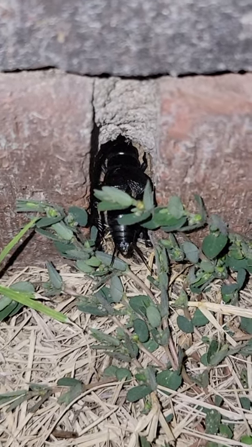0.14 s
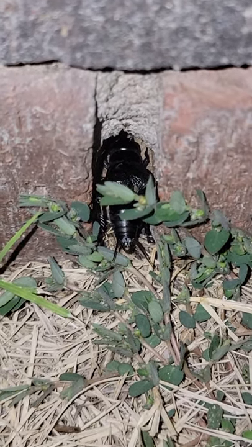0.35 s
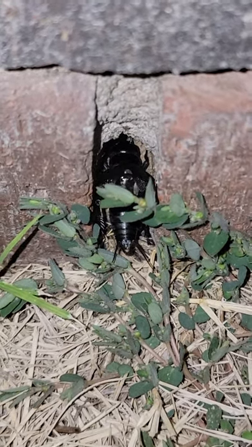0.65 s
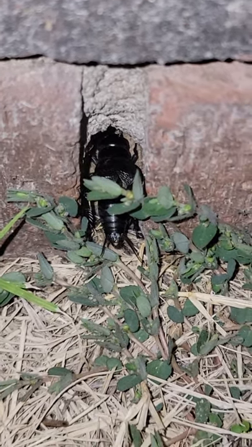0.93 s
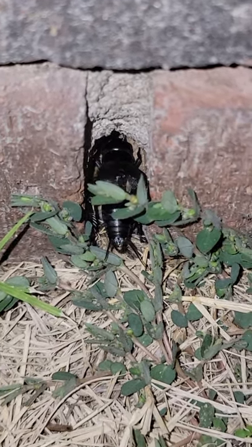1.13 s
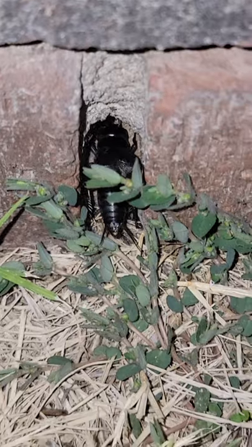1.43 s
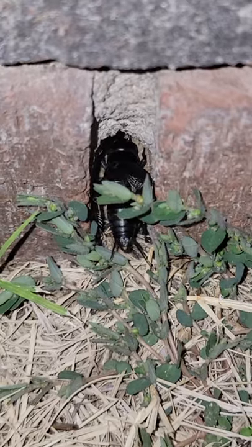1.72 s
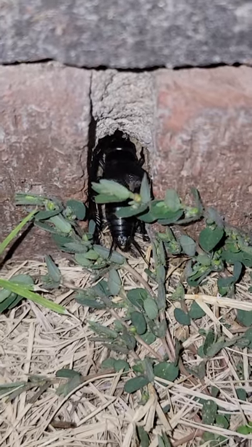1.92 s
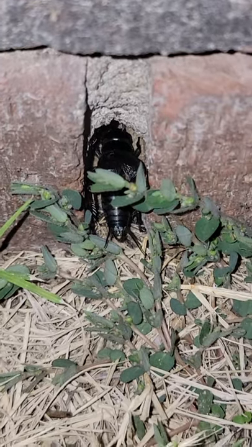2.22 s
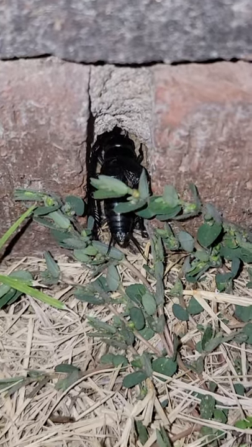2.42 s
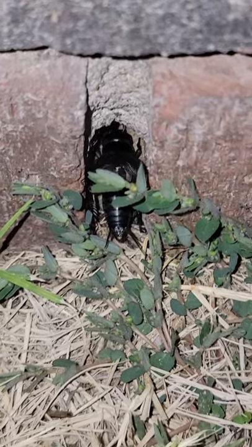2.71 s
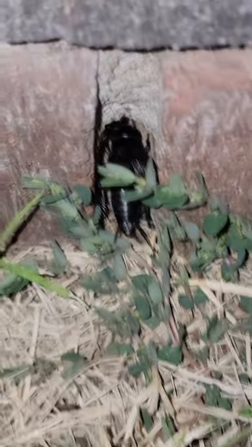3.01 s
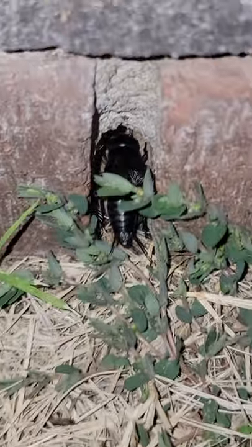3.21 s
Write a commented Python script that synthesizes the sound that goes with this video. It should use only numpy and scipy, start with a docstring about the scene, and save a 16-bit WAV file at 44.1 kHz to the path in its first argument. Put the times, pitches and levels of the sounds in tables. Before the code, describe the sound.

A cricket chirps close by in short, ringing bursts over a low outdoor rumble.

```python
"""A field cricket chirps close by, at the mouth of a hole in a brick wall, over a low outdoor rumble.
Each chirp is a scratchy or soft wing stroke or two, then two loud, pure ones that arch in pitch:
a scraper on one wing runs along a row of teeth (the file) on the other and makes the wing ring.
Traffic fades and faint whistles sound far off. A hand bumps the camera now and then,
and near the end shifts its grip and rubs over the case."""
import sys
import numpy as np
from scipy import signal
from scipy.fft import rfft, irfft
from scipy.io import wavfile
from scipy.ndimage import uniform_filter1d, minimum_filter1d

SR = 44100
rng = np.random.default_rng(int(sys.argv[2]) if len(sys.argv) > 2 else 0)


def generate_wav(signal):
    """Clip the signal to [-1, 1] and save it as 16-bit WAV at the path in sys.argv[1]."""
    frames = np.transpose(np.atleast_2d(signal))
    scaled = np.clip(frames, -1, 1) * 32767
    pcm = np.round(scaled).astype(np.int16)
    wavfile.write(sys.argv[1], SR, pcm)


N = 147735

# Wing strokes that ring. Each row: start in seconds, length in seconds, level in dB,
# top pitch in Hz, depth of the pitch arch from 0 to 1.
STROKES = [(0.4856, 0.031, -35, 4025, 0.4), (0.572, .041, -24.5, 4242, 0.93),
           (0.683, 0.045, -25, 4248, 0.98), (1.13, 0.025, -33, 4050, 0.55),
           (1.190, 0.035, -30.5, 4117, 0.63), (1.281, 0.045, -24.7, 4240, 1),
           (1.395, 0.046, -24.5, 4246, 0.99), (1.85, 0.011, -35.5, 3890, 0.06),
           (1.873, .007, -48, 4000, 0.1), (1.911, 0.037, -31, 4140, 0.66), (1.9939, 0.046, -25, 4234, 1),
           (2.1029, 0.047, -25.5, 4250, 0.98), (2.644, .031, -34, 4030, 0.34),
           (2.725, .042, -25.5, 4217, .95), (2.835, 0.047, -26.5, 4245, 1), (3.326, 0.043, -33, 4040, 0.54)]
WING_HZ, CATCH_S = 3790, 0.0065  # pitch and length of the ring when the scraper catches once


def amp(db):
    """Turns decibels into a number to multiply by."""
    return 10 ** (np.asarray(db) / 20)


def unit(x):
    """Scales a signal to an average power of 1."""
    return x / np.sqrt(np.mean(x ** 2) + 1e-20)


def read(points, hz):
    """Looks up a frequency in a table, blending between rows on a pitch scale."""
    row_hz, value = np.transpose(points)
    return np.interp(np.log(hz + 1), np.log(row_hz + 1), value)


def add(mix, start, sound):
    """Mixes a sound in, with its start given in seconds."""
    part = mix[..., round(start * SR):][..., :sound.shape[-1]]
    part += sound[..., :part.shape[-1]]


def pan(db):
    """Left and right gains that make the left side louder by db."""
    return amp(np.array([[db], [-db]]) / 2)


def noise(colour, level=1):
    """Noise that follows a level curve, then takes its tone colour from a table."""
    white = level * rng.standard_normal(N)
    gains = unit(amp(read(colour, np.fft.rfftfreq(N, 1 / SR))))
    return irfft(rfft(white) * gains, N)


def wander(rate_hz):
    """A smooth random wobble of size about 1, moving at up to about rate_hz."""
    smoothing = np.exp(-(np.fft.rfftfreq(N, 1 / SR) / rate_hz) ** 2)
    return unit(irfft(rfft(rng.standard_normal(N)) * smoothing, N))


def wall_echo(sound):
    """The walls around scatter a sound back as a faint, smooth echo."""
    echo_db, fade_s = -29.5, 0.54  # fade_s is the time to fall by 60 dB
    t = np.arange(SR // 2) / SR
    early_boost = 1 + 2 * np.exp(-t / 0.021)
    tail = rng.standard_normal((2, len(t))) * amp(-60 * t / fade_s) * early_boost
    tail /= np.linalg.norm(tail[0])
    return amp(echo_db) * signal.fftconvolve(sound[1:], tail, axes=1)[:, :N]


def outdoors():
    """Low outdoor rumble, the wavering drone of distant engines, and traffic dying away."""
    # Tone colours of the open air and the traffic. Each row: frequency in Hz, relative level in dB.
    air_colour = [(12, -46), (20, -13), (38, -5), (64, -0.5), (119, -7), (144, -25.5), (171, -14.5),
                  (232, -18.5), (259, -24.5), (324, -26), (400, -27), (581, -27.5), (760, -29.5),
                  (1150, -39.5), (1400, -40), (1750, -47), (4000, -56), (7500, -64), (8800, -71.5),
                  (12500, -78.5), (15500, -71)]
    traffic_colour = [(100, -30.5), (220, 3), (400, 3), (700, -12.5), (1200, -31.5), (2000, -40.5),
                      (8000, -70.5)]
    # Engine notes. Each row: pitch in Hz, width of the wavering in Hz, level in dB.
    engines = [(72.9, 27, -41.5), (112.7, 27, -41), (231.5, 24, -53), (345, 20, -60)]
    # How alike the two sides sound. Each row: frequency in Hz, likeness from 0 to 1.
    likeness = [(30, 0.63), (80, 1), (300, 1), (700, 0.6), (1500, 0.1), (4000, 0.073), (15000, 0.077)]
    # How much louder the left side is. Each row: frequency in Hz, difference in dB.
    left_louder = [(25, 3), (70, 1.5), (150, -2), (400, 2), (1500, 2.5), (8000, 1)]
    # How far the left side lags. Each row: frequency in Hz, lag in radians.
    left_lag = [(20, .2), (70, 0.9), (200, 0.27), (500, 0.64), (1000, 1.2)]
    t, hz = np.arange(N) / SR, np.fft.rfftfreq(N, 1 / SR)
    traffic_level = amp(-44.5 - 9.5 * t)
    rumbles = []
    for _ in range(2):
        air = amp(-35 + wander(3.8)) * noise(air_colour)
        rumbles.append(rfft(air + traffic_level * noise(traffic_colour)))
    drone = 0
    for pitch, width, db in engines:
        phase = 2 * np.pi * pitch * t
        note = wander(width / 2) * np.cos(phase) + wander(width / 2) * np.sin(phase)
        drone += rfft(amp(db) * unit(note))
    same, tilt = read(likeness, hz), amp(read(left_louder, hz) / 2)
    left = (rumbles[0] + drone) * tilt * np.exp(-1j * read(left_lag, hz))
    right = (same * rumbles[0] + np.sqrt(1 - same ** 2) * rumbles[1] + drone) / tilt
    return irfft(np.array([left, right]), N)


def far_whistles():
    """Thin falling whistles, perhaps a bird, so far off that the echo is a large part of them."""
    # Each row is a whistle: start in seconds, length in seconds, level in dB, starting pitch in Hz.
    whistles = [(0.485, 0.047, -66, 1360), (0.546, .125, -58, 1374), (0.75, 0.045, -63, 1360)]
    out = np.zeros((2, N))
    for start, length, db, top_hz in whistles:
        t = np.arange(0, length, 1 / SR)
        hz = top_hz - 5800 * t ** 2
        swell = amp(db) * np.sin(np.pi * t / length)
        add(out, start, swell * np.sin(2 * np.pi * np.cumsum(hz) / SR))
    return out + amp(28) * wall_echo(out)


def hand_on_camera():
    """Each bump is a push that the microphone's bass cut turns into a thud; skin ticks and rubs."""
    # Bumps on the case. Each row: time in seconds, peak level in dB, width of the push in seconds,
    # how much louder the left side is in dB, level of the contact tick in dB.
    bumps = [(1.2902, -17.5, 0.0026, 12, -61), (1.4492, -15.5, 0.0028, 12.5, -51),
             (2.21, -30, 0.0019, 17, -68), (2.2189, -25, 0.0027, 15.5, -62),
             (2.3095, -21, 0.0036, 20.5, -70), (2.904, -28.5, 0.001, 18, -59),
             (2.916, -19.5, 0.0067, 13, -31.5), (2.934, -28, 0.0021, 16, -59),
             (2.9555, -28, 0.0017, 10, -37.5), (2.9617, -9, .0019, 12, -56),
             (2.9832, -15.5, .001, 13, -30.5), (2.9998, -18, 0.0027, -10, -21),
             (3.0386, -17, 0.0012, -17.5, -58), (3.0417, -23, 0.0015, -38.5, -73),
             (3.0515, 0.5, .0014, -4.5, -16.5), (3.16, -21, 0.0026, -4, -80),
             (3.2089, -29, 0.00024, -4, -22), (3.211, -17.5, 0.00091, -5, -35),
             (3.234, -17.5, 0.00043, -14, -42), (3.24, -17, 0.0052, 0.5, -72)]
    # How loudly the fingers rub. Each row: time in seconds, level in dB.
    rub_curve = [(2.88, -64.5), (2.945, -56.5), (2.958, -43), (2.991, -54), (3.004, -38.5), (3.03, -49.5),
                 (3.11, -48.5), (3.16, -55), (3.206, -52), (3.208, -31.5), (3.222, -39.5), (3.29, -39.5),
                 (3.35, -40)]
    # Tone colours of the rubbing, the ticks and the deep rumble as the grip shifts.
    # Each row: frequency in Hz, relative level in dB.
    rub_colour = [(300, -20.5), (700, -4), (1300, 0), (1900, -2), (2200, -7), (2900, -4.5), (4400, -11),
                  (6500, -16), (7500, -22.5), (8500, -30.5), (10500, -37), (13000, -40), (15500, -42)]
    tick_colour = [(300, 13), (1300, 12.5), (2200, -5), (3000, 10), (4300, -10.5), (6800, -10), (8500, -25),
                   (15000, -47)]
    grip_colour = [(10, -8.5), (25, -3.5), (55, -1), (90, -6.5), (160, -16.5), (400, -57.5), (2000, -100)]
    thuds, tick_level = np.zeros((2, N)), np.zeros(N)
    t = np.arange(-SR // 50, SR // 6) / SR
    bass_cut = signal.butter(4, 57.5, "highpass", fs=SR, output="sos")
    for when, db, width, left_db, tick_db in bumps:
        push = 1 / np.cosh(np.clip(2 * t / width, -20, 20))
        leaked = signal.lfilter([1, -1], [1, -np.exp(-0.76 / width / SR)], push)  # the push leaks away
        thud = signal.sosfilt(bass_cut, leaked)
        add(thuds, when + t[0], amp(db) * pan(left_db) * thud / abs(thud).max())
        add(tick_level, when, amp(tick_db) * np.exp(-t[t >= 0] / 0.0011))
    clock = np.arange(N) / SR
    rub_db = np.interp(clock, *np.transpose(rub_curve), left=-120)
    rub_level = amp(rub_db - wander(900))  # the fast wobble makes it grainy
    grip_swell = np.exp(-((clock - 2.98) / 0.052) ** 2)
    grip = amp(-18) * grip_swell * noise(grip_colour)
    skin = np.array([noise(rub_colour, rub_level) + noise(tick_colour, tick_level) for _ in range(2)])
    return thuds + pan(8) * grip + pan(1) * skin


def place_cricket(sound, hz):
    """The cricket reaches the left microphone weaker, the more so at low pitch."""
    left_db = -4.5 + 0.0483 * np.clip(hz - 4216, -300, 300)
    return np.array([sound * amp(left_db), sound])


def skid(length, db):
    """The scraper catches and loses the file; each catch rings the wing for a moment."""
    catches_per_s, spread_hz = 200, 120
    out = np.zeros(int((length + 2 * CATCH_S) * SR))
    t = np.arange(0, CATCH_S, 1 / SR)
    swell = np.sin(np.pi * (t / CATCH_S) ** 0.52) ** 2
    for k, (late, detune, strength) in enumerate(2 * rng.random((12, 3)) - 1):
        start = (k + 0.18 * (late + 1)) / catches_per_s
        if start < length:
            ring = np.sin(2 * np.pi * (WING_HZ + spread_hz * detune) * t)
            add(out, start, amp(db + 2 * strength) * swell * ring)
    return place_cricket(out, WING_HZ)


def stroke_pitch(progress, top_hz, arch):
    """The pitch rises and falls with wing speed, peaking mid-stroke, or later in soft strokes."""
    crest = 0.49 + 0.33 * (1 - arch)
    before_crest = 152 * np.cos(np.pi / 2 * progress / crest) ** 2
    after_crest = 560 * ((progress - crest) / (1 - crest)) ** 2
    return top_hz - arch * np.where(progress < crest, before_crest, after_crest)


def wing_strokes():
    """The scraper drives the wing at the rate it hits teeth. Gives the song and its rasp's level."""
    # Loudness through a stroke. Each row: progress from 0 to 1, strength from 0 to 1.
    stroke_shape = [(0, 0), (.03, .33), (.3, 1), (.6, 1), (.76, 0.81), (.93, 0.2), (1, 0)]
    # The wing's higher tones. Each row: multiple of the pitch, relative level in dB.
    overtones = [(2, -27), (3, -32)]
    # Boost or cut for those tones. Each row: frequency in Hz, change in dB.
    overtone_colour = [(7600, -5.5), (8100, 2.5), (8500, -7.5), (9000, -5), (11400, -9.5), (12000, -1.5),
                       (12400, -0.5), (12800, -9)]
    left_lead_s, snap_s, reopen_s = 0.00006, 0.0012, 0.031
    song, rasp_level = np.zeros((2, N)), np.zeros(N)
    jitter_hz = 10 * wander(400)
    shimmer = 1 + 0.034 * wander(350)
    flutter = amp(1.5 * wander(500))
    for start, length, db, top_hz, arch in STROKES:
        t = np.arange(0, length, 1 / SR)
        progress = t / length
        samples = (round(start * SR) + np.arange(len(t))) % N
        hz = stroke_pitch(progress, top_hz, arch) + jitter_hz[samples]
        phase = 2 * np.pi * (np.cumsum(hz) / SR + hz * np.array([[left_lead_s], [0]]))
        upper = sum(amp(tone_db + read(overtone_colour, k * hz)) * np.sin(k * phase)
                    for k, tone_db in overtones)
        level = amp(db) * np.interp(progress, *np.transpose(stroke_shape)) * shimmer[samples]
        add(song, start, place_cricket(level, hz) * (np.sin(phase) + flutter[samples] * upper))
        # The rasp snaps at the start and, far more faintly, at the end.
        snaps = np.exp(-t / snap_s) + np.exp(-abs(t - 1.2 * length) / snap_s)
        add(rasp_level, start, amp(-38.5) * level + amp(db - 26) * snaps)
        add(song, start + length + reopen_s, skid(CATCH_S / 2, db - 36))  # the wings tick as they reopen
    return song, rasp_level


def cricket():
    """Ringing strokes and scratchy skids; slips add a dry rasp, and the moving wings sizzle faintly."""
    # Skids over the file, and faint brushes as the wings open.
    # Each row: start in seconds, length in seconds, ring level in dB, rasp level in dB.
    skids = [(0.4229, .02, -39.5, -46), (1.201, 0.0092, -54.5, -50.5), (1.856, .012, -41, -45),
             (1.926, .007, -43, -50.5), (2.581, 0.021, -38, -48)]
    brushes = [(0.385, 0.018, -53.5, -65.5), (1.09, 0.027, -52.5, -68.5), (1.816, 0.013, -53, -65),
               (2.545, 0.015, -50, -67)]
    # Tone colours of the rasp and the sizzle. Each row: frequency in Hz, relative level in dB.
    rasp_colour = [(1500, -24.5), (2600, -6.5), (3800, 0.5), (5000, -3), (6500, -3), (7700, -10.5),
                   (8800, -19), (10500, -31.5), (12500, -18.5), (14000, -20), (15500, -6)]
    sizzle_colour = [(2000, -21), (3800, 16), (5000, -5.5), (7000, 5.5), (8800, -16.5), (10500, -18.5),
                     (12500, -9), (15500, -2)]
    song, rasp_level = wing_strokes()
    for start, length, ring_db, rasp_db in skids + brushes:
        add(song, start, skid(length, ring_db))
        swell = np.hanning(int((length + CATCH_S / 2) * SR)) ** 0.63
        add(rasp_level, start, amp(rasp_db) * swell)
    rasp_level *= unit(amp(2.5 * wander(2500)))  # single teeth make the rasp crackle
    movement = np.zeros(N)
    for start, *_ in STROKES + skids + brushes:
        add(movement, start, np.hanning(int(0.092 * SR)) ** 0.5)
    sizzle_level = amp(-67.5) * np.sqrt(movement)
    hiss = [noise(rasp_colour, rasp_level) + noise(sizzle_colour, sizzle_level) for _ in range(2)]
    flicker = amp(3.2 * wander(400))
    return song + flicker * amp([[-7], [0]]) * np.array(hiss)  # the hiss is weaker on the left


def scene():
    """The cricket and its echo, the background and the hand on the camera."""
    song = cricket()
    return song + wall_echo(song) + outdoors() + far_whistles() + hand_on_camera()


def record(dry):
    """A fast limiter turns down the loudest peaks; the ends fade and the highest treble is cut."""
    ceiling, fade_s, top_hz = 0.98, 0.004, 15850
    safe_gain = np.minimum(ceiling / (abs(dry).max(0) + 1e-9), 1)
    gain = uniform_filter1d(minimum_filter1d(safe_gain, size=241), size=241)
    fade_in = np.minimum(np.arange(N) / (fade_s * SR), 1)
    treble_cut = signal.firwin(511, top_hz, window=("kaiser", 9), fs=SR)
    return signal.oaconvolve(dry * gain * fade_in * fade_in[::-1], treble_cut[None], "same")


dry = scene()
out = record(dry)
generate_wav(out)
```